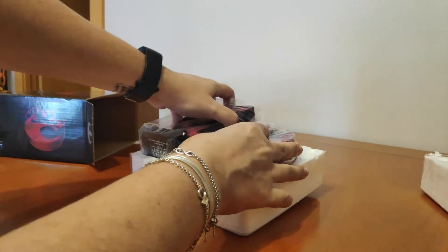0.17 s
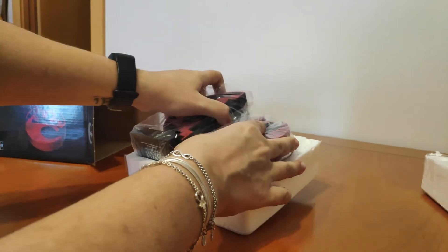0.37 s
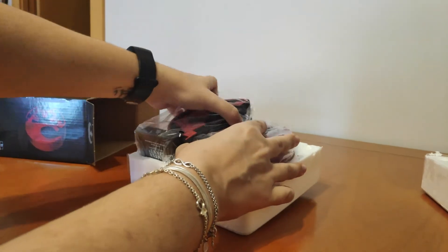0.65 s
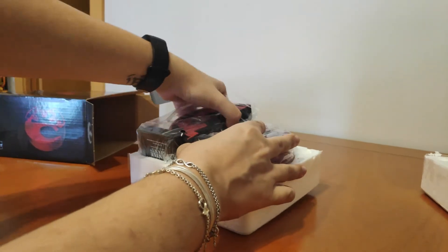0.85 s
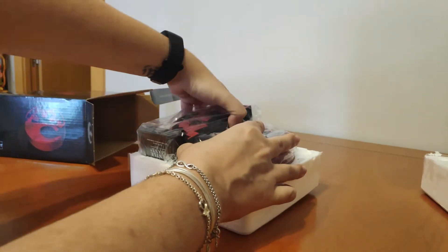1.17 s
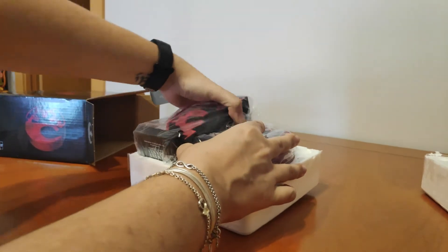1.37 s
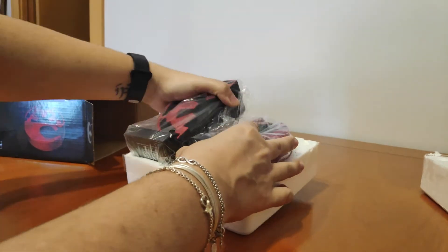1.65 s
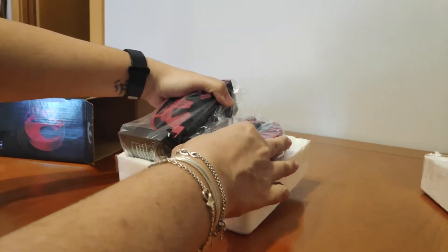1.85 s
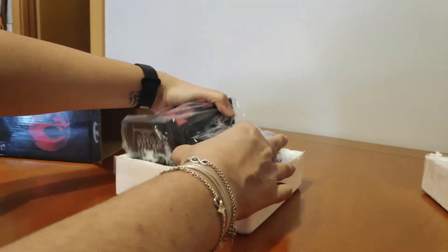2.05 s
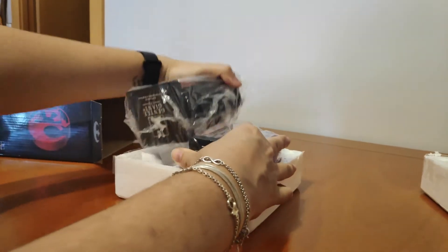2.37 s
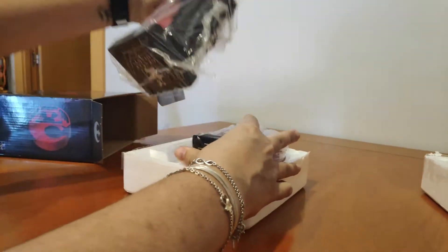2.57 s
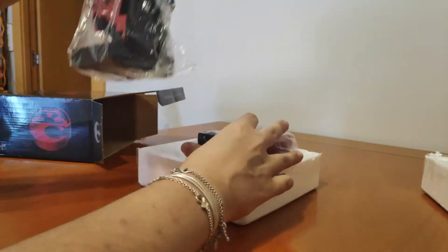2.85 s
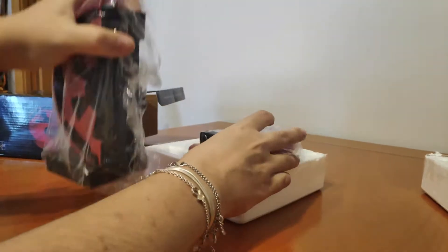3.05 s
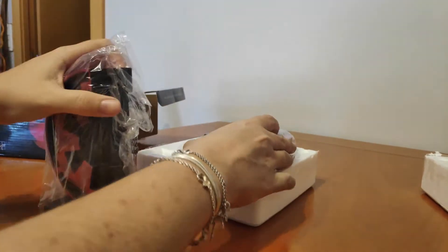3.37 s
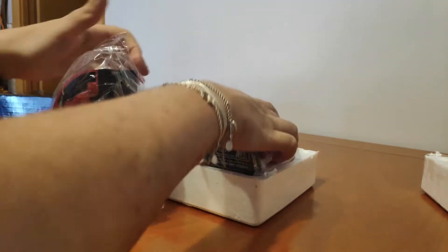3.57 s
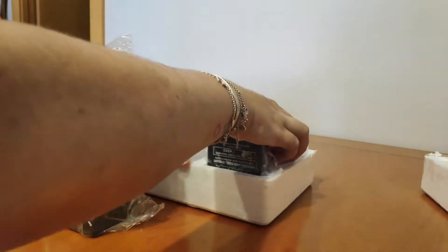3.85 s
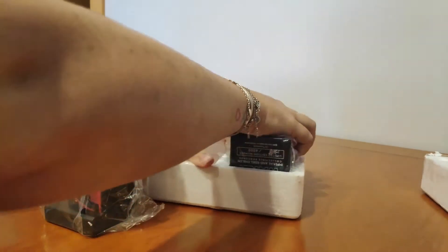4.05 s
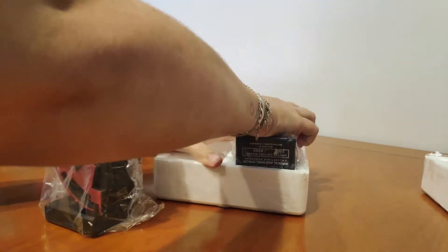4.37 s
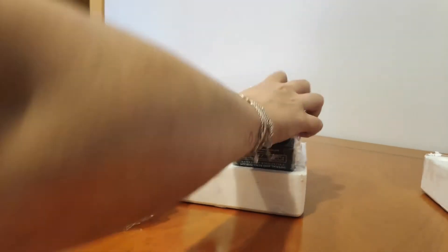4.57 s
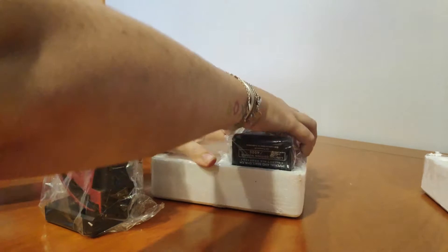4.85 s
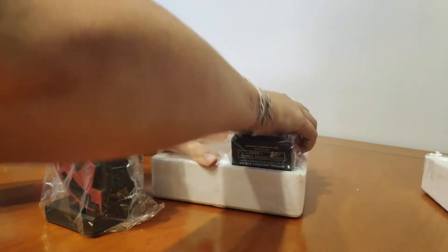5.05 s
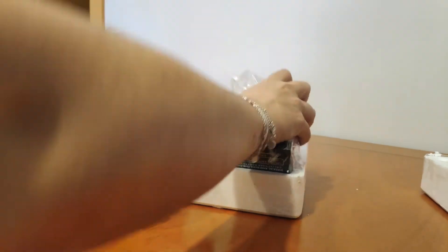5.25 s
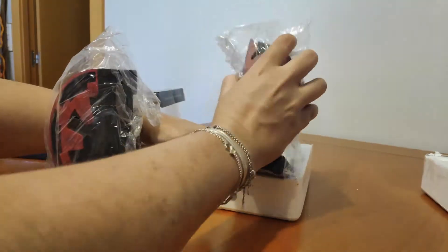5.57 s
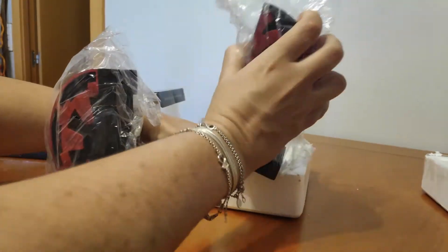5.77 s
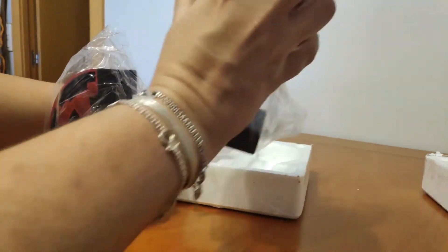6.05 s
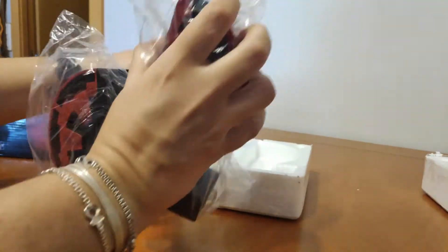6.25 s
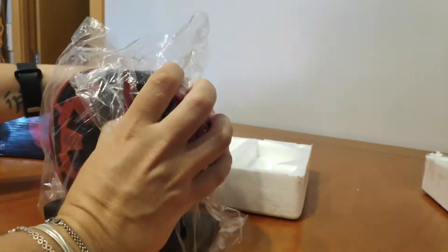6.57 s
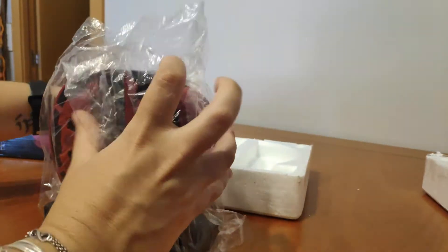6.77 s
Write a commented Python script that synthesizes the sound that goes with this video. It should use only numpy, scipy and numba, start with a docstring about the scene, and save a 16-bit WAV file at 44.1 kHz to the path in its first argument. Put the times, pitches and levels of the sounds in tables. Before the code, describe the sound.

Hands work wrapped, heavy objects out of a foam tray on a wooden table. Thin plastic rustles throughout, pricked by dry snaps. High, sliding foam squeaks cluster between two and a half and three and a half seconds and again around four, with brief later ones. One solid knock sounds midway and the strongest, resonant one near the end. Near microphones, slight room reflections, quiet background hiss.

```python
"""Hands work two heavy, bagged pieces out of a stiff foam tray on a wooden table, near two microphone ports.
Over air hiss and a low rumble the bag rustles throughout: dense tiny ticks, scuffs and short snapping bursts.
From about 2 s the bag sticks and slips on the foam: gliding overtone stacks with grit, until 5.6 s.
Blows ring the table's modes, soft at first, one strong at 3.3 s, the strongest at 6.55 s as a piece lands.
A small room answers with a decaying scatter of reflections."""
import sys
import numpy as np
from scipy import signal
from scipy.fft import rfft, irfft, next_fast_len
from scipy.io import wavfile
from scipy.ndimage import uniform_filter1d
from numba import njit

SR = 44100
rng = np.random.default_rng(int(sys.argv[2]) if len(sys.argv) > 2 else 0)


def output_pcm(signal):
    """Save a mono or channel-first signal as 16-bit PCM at the path in sys.argv[1].

    Samples are clipped to [-1, 1] before scaling.
    """
    pcm = np.clip(np.atleast_2d(signal).T, -1, 1) * 32767
    wavfile.write(sys.argv[1], SR, np.round(pcm).astype(np.int16))


N = 304863
TOP_HZ = 14280  # upper limit of overtones and of the output

# stick-slip squeaks: (overtones [dB, relative], grit [dB, relative],
# path of (time [s], slip rate [Hz], level [dB]))
SQUEAKS = [ (2, -9, [(1.983, 1760, -46), (1.99, 1980, -43), (2.0, 2670, -41)]),
           (-20, -5, [(2.462, 1880, -42), (2.472, 2594, -30), (2.482, 4300, -28)]),
           (-1, 3.5, [(2.46, 2140, -49), (2.485, 2980, -24), (2.53, 5130, -21), (2.555, 6430, -23),
           (2.573, 6260, -18), (2.59, 3820, -21.5), (2.606, 1710, -21)]), (-4, -1, [(2.655, 2090, -14.5),
           (2.668, 1905, -30), (2.688, 2670, -23.5)]), (6, -5, [(2.684, 2700, -30.5), (2.73, 2670, -32),
           (2.768, 3106, -24.5)]), (-7, -10.5, [(2.772, 2320, -24), (2.78, 1895, -23.5),
           (2.795, 1540, -49)]), (5, 7.5, [(2.836, 3190, -22), (2.857, 4510, -29.5), (2.869, 4310, -19)]),
           (5.5, 7, [(2.948, 4850, -27), (2.958, 4140, -30), (2.972, 1700, -32)]),
           (-9, 11, [(2.978, 8280, -22.5), (2.99, 4220, -38), (3.004, 1710, -24.5)]),
           (-10, -16, [(3.203, 6800, -26), (3.22, 9600, -18), (3.243, 5940, -53)]),
           (4, 10, [(3.186, 1790, -39), (3.205, 2715, -33), (3.22, 3130, -36), (3.248, 2770, -31)]),
           (1, 4, [(3.242, 2770, -34), (3.258, 3930, -25), (3.275, 4760, -23), (3.293, 5240, -26),
           (3.303, 4320, -26), (3.317, 4320, -25), (3.333, 2510, -28)]), (7, -24, [(3.238, 2280, -46),
           (3.255, 1910, -37), (3.27, 2380, -28)]), (-8, 3, [(3.33, 4234, -10), (3.34, 4310, -30.5),
           (3.373, 7920, -24), (3.384, 6730, -22.5), (3.393, 3926, -25.5), (3.408, 1430, -30)]),
           (6, -17, [(3.33, 2350, -34), (3.38, 1700, -39)]), (-6, 3, [(3.892, 2060, -35),
           (3.912, 5230, -26.5), (3.934, 8700, -17)]), (-13, 1.5, [(3.925, 2830, -44), (3.955, 2074, -34.5),
           (3.985, 2770, -46)]), (2.5, -14.5, [(3.962, 3090, -14), (3.978, 4780, -24.5), (4.0, 8120, -16),
           (4.012, 7150, -15), (4.026, 6100, -23)]), (-1, -22, [(4.02, 6030, -15), (4.033, 6180, -21),
           (4.046, 4770, -24.5), (4.072, 4850, -21), (4.085, 6000, -16), (4.104, 6580, -12.5)]),
           (-10, -22.5, [(3.974, 10110, -19), (3.985, 9680, -12.5), (4.01, 9300, -22.5)]),
           (6, -2, [(4.108, 5670, -13.5), (4.12, 4870, -23.5), (4.131, 5750, -18.5)]),
           (-8, -35, [(4.132, 8700, -12.5), (4.155, 9440, -9), (4.178, 11250, -39), (4.19, 11300, -26.5)]),
           (-10, -39, [(4.132, 8000, -17.5), (4.155, 8700, -20.5)]), (-3.5, 7.5, [(4.224, 5084, -19),
           (4.232, 4460, -25), (4.246, 2883, -25.5), (4.259, 706, -31)]), (13.5, 14, [(4.604, 701, -38.5),
           (4.62, 900, -40), (4.641, 1820, -25.5)]), (-8.5, -4, [(4.635, 1530, -15.5), (4.658, 2950, -16),
           (4.667, 3120, -10), (4.678, 3035, -16), (4.69, 2530, -25)]), (-8, 5, [(5.325, 3504, -39),
           (5.34, 3520, -37), (5.355, 3010, -29), (5.365, 2624, -34), (5.374, 1290, -25)]),
           (-1, 3, [(5.508, 1236, -38), (5.518, 1280, -44.5), (5.527, 1080, -40)]),
           (5.5, 4.5, [(5.55, 713, -35), (5.562, 1387, -33.5), (5.577, 1731, -28), (5.592, 1336, -31),
           (5.607, 656, -33.5)]), ]
# spectrum of the crisp crinkle: (frequency [Hz], density [dB per Hz, relative])
CRISP = [(1500, -35), (3500, -10), (5000, -1.5), (7500, 4.5), (10500, -1), (13000, 0.5), (15000, 2)]
# spectrum of the dull crinkle: (frequency [Hz], density [dB per Hz, relative])
DULL = [(200, -31.5), (500, -1), (1200, 2.5), (2500, -2), (4000, -5), (6000, -10.5)]


def undb(db):
    """Gain of a level in dB."""
    return 10 ** (np.asarray(db) / 20)


def unit(x):
    """Scale to rms 1."""
    return x / np.sqrt(np.mean(x ** 2))


def colour(x, table):
    """Filter by a (frequency [Hz], level [dB]) table, interpolated over log frequency."""
    size = next_fast_len(x.shape[-1] + 2048)
    hz, db = np.transpose(table)
    bin_hz = np.arange(size // 2 + 1) * SR / size
    gain = undb(np.interp(np.log(bin_hz + 1), np.log(hz), db))
    return irfft(rfft(x, size) * gain, size)[..., :x.shape[-1]]


def walk(rate_hz):
    """Random levels, smoothed twice over 1 / rate_hz; spread near 1."""
    k = max(int(SR / rate_hz), 1)
    steps = rng.standard_normal(N // 20)[np.arange(N) // max(k, 21)]
    return 1.3 * uniform_filter1d(uniform_filter1d(steps, k), k)


def add(track, start_s, piece):
    """Mix a piece into the track at a time."""
    i = int(start_s * SR)
    track[..., i:i + piece.shape[-1]] += piece[..., :N - i]


@njit
def above(x, hz):
    """State-variable high-pass whose edge moves every sample."""
    y, band, low_state = np.empty(len(x)), 0., 0.
    damping = 1.2
    for i in range(len(x)):
        g = np.tan(np.pi * hz[i] / SR)
        v = (band + g * (x[i] - low_state)) / (1 + g * (g + damping))
        low = low_state + g * v
        y[i] = x[i] - damping * v - low
        band = 2 * v - band
        low_state = 2 * low - low_state
    return y


def grains(spread_db, likeness):
    """Dense tiny ticks of uneven size, partly shared by both ports: a crisp and a dull stream."""
    sizes = undb(spread_db * rng.exponential(1., (2, N)))
    shared = rng.standard_normal((2, N))
    own = rng.standard_normal((2, 2, N))
    likeness = np.clip(likeness, 0, 1)
    ticks = sizes * (np.sqrt(likeness) * shared + np.sqrt(1 - likeness) * own)
    return unit(colour(ticks[:, 0], CRISP)), unit(colour(ticks[:, 1], DULL))


def air():
    """Quiet room noise, alike at both ports in the bass, and a swelling rumble."""
    # room noise spectrum: (frequency [Hz], density [dB, relative])
    air_spectrum = [(25, 7.5), (100, -8.5), (200, -8.5), (400, -10.5), (1000, -18.5), (3000, -30),
                    (7500, -45), (14000, -46)]
    air_db, rumble_hz, rumble_db = -57, 44, -56.5
    mid, side = rng.standard_normal((2, N))
    side = colour(side, [(150, -13), (1200, -6.5)])
    hiss = unit(colour(np.array([mid + side, mid - side]), air_spectrum)) * undb(air_db)
    band = [(rumble_hz * 0.23, -20), (rumble_hz, 0), (rumble_hz * 1.3, -3),
            (rumble_hz * 1.94, -35), (300, -90)]
    rumble = unit(colour(rng.standard_normal(N), band))
    return hiss + rumble * undb(rumble_db + 0.5 * walk(0.96))


def room(x):
    """Decaying scatter of reflections, different at each port."""
    t60_s, level_db, top_hz = .42, -12, 9000
    t = np.arange(SR // 2) / SR
    onset = np.clip((t - .002) / 0.0033, 0, 1)
    tail = rng.standard_normal((2, len(t))) * 1000. ** (-t / t60_s) * onset
    tail = signal.lfilter(*signal.butter(1, top_hz, fs=SR), tail)
    tail = tail / np.sqrt(np.sum(tail ** 2, axis=1, keepdims=True))
    return undb(level_db) * signal.fftconvolve(x, tail, axes=1)[:, :N]


def crackle():
    """Sparse small creases at random moments, a few of them much louder than the rest."""
    creases_per_s = 700
    struck = rng.random(N) < creases_per_s / SR
    sizes = undb(5.4 * np.minimum(rng.exponential(1., N), 4.0))
    ticks = struck * sizes * rng.standard_normal(N)
    fold = rng.standard_normal((2, 60)) * np.exp(-np.arange(60) / 23.0)
    return unit(colour(signal.fftconvolve(ticks[None], fold, axes=1)[:, :N], CRISP))


def settling():
    """The jolt of every squeak stretches the bag, which crinkles on as it relaxes."""
    level_db, t60_s = -7, .3
    t, strain = np.arange(N) / SR, np.zeros(N)
    for _, grit_db, path in SQUEAKS:
        s, _, db = np.transpose(path)
        strain += (t > s[0]) * (t < s[-1]) * undb(np.interp(t, s, db) + min(grit_db, 0))
    keep = 1000. ** (-1 / (t60_s * SR))
    return undb(level_db) * signal.lfilter([1 - keep], [1, -keep], strain)


def rustle():
    """The bag's crinkle under the hands and its toneless scuffs from one stream of grains, plus crackle."""
    # rustling under the hands: (time [s], crisp part [dB])
    hand_levels = [(0, -55), (.15, -46.5), (.38, -48.5), (.44, -60.5), (.6, -40.5), (.9, -46),
                   (1.05, -45.5), (1.6, -44.5), (1.92, -53), (2.0, -37), (2.4, -49.5), (3.7, -43),
                   (4.45, -47), (4.9, -41.5), (5.12, -41.5), (5.3, -42.5), (5.8, -36), (5.9, -36.5),
                   (6.08, -61), (6.17, -61.5), (6.28, -51), (6.91, -43.5)]
    # scuffs: (time [s], length [s], level [dB], dull part [dB, relative])
    scuffs = [(0.704, 0.13, -42.5, 2.5), (1.308, 0.039, -48.5, -1.5), (1.433, 0.014, -44, -6),
              (1.671, 0.047, -35, -11), (2.018, 0.012, -18.5, -15), (2.132, 0.055, -24.5, -10),
              (2.24, 0.033, -26, -7), (3.722, 0.014, -30, -19), (4.745, 0.074, -29, -3),
              (5.019, 0.025, -42.5, -5), (5.408, 0.0072, -21.5, -6), (5.703, 0.0059, -26.5, 2.5),
              (5.706, 0.039, -24, -11), (6.296, 0.038, -41, -24), (6.85, 0.057, -34.5, -9)]
    hands_dull_db, settle_dull_db = -7.5, -23  # relative to their crisp parts
    swell_db, swell_hz = 1.2, 12  # the hands never press evenly
    t = np.arange(N) / SR
    hands = undb(np.interp(t, *np.transpose(hand_levels)) + swell_db * walk(swell_hz))
    after = settling()
    flicker = undb(0.6 * walk(35) + 1.67 * walk(90))
    bright = (hands + after) * flicker
    dark = hands * undb(hands_dull_db) + after * undb(settle_dull_db)
    dark = dark * flicker * undb(3.04 * walk(30))
    creases = undb(-4.0) * hands * flicker * crackle()
    for start_s, length_s, db, dull_db in scuffs:
        u = np.arange(int(length_s * SR) + 1) / (length_s * SR)
        shape = undb(db) * np.clip(u / 0.42, 0, 1) * np.clip((1 - u) / 0.72, 0, 1)
        add(bright, start_s, shape)
        add(dark, start_s, shape * undb(dull_db))
    crisp, dull = grains(spread_db=1.98, likeness=0.049)
    # the folds that sound keep changing size, so the colour wanders
    fold_hz = np.clip(2600 * np.exp(0.28 * walk(30)), 500, 8000)
    crisp = np.array([above(n, fold_hz) for n in crisp + undb(-6) * dull])
    return bright * crisp + dark * dull + creases


def knocks():
    """A rounded push rings the table top; a softer contact pushes longer and favours the low modes."""
    # blows: (time [s], peak [dB], contact time constant [s], boost of the edge modes [dB])
    blow_list = [(0, -35.5, .0012, 25), (0.758, -33.5, 0.000061, 16), (2.013, -18.5, 0.0062, -9),
                 (3.315, -10, 0.00024, 14.5), (4.766, -32, 0.001, -2), (5.406, -32, 0.000054, 17),
                 (5.66, -40, 0.00031, 3), (6.5517, -4, 0.0002, -2.5)]
    # table top modes: (frequency [Hz], level [dB, relative], t60 [s])
    modes = [(42.3, -12, 0.93), (104, 3.5, 0.05), (119.2, -2.5, 0.4), (211.3, -18, 0.9), (256, -7, 0.49),
             (301, 2, 0.17), (400, 9, 0.051), (523, -18, 0.33), (602, -6.5, 0.095), (709, -15.5, 0.11),
             (1016, -8, 0.096), (1195, 7.5, 0.042), (1318, 2, 0.064)]
    # modes that depend on where the blow lands: (lower limit [Hz], upper limit [Hz])
    edge_range_hz = 450, 900
    out, t = np.zeros((2, N)), np.arange(SR) / SR
    spots = rng.standard_normal((len(blow_list), 2, len(modes)))
    rattle = rng.standard_normal((len(blow_list), 2, len(t)))
    shake_band = signal.butter(2, (90, 420), "bandpass", fs=SR)
    for (s, peak_db, contact_s, edge_db), spot, noise in zip(blow_list, spots, rattle):
        ring = 0
        for (hz, mode_db, t60_s), spot_level in zip(modes, spot.T):
            place_db = edge_db * (edge_range_hz[0] < hz < edge_range_hz[1])
            gain = undb(mode_db + place_db + 2.4 * spot_level[:, None])
            ring = ring + gain * np.sin(2 * np.pi * hz * t) * 1000. ** (-t / t60_s)
        # things standing on the table shake along and blur the low ring
        shake = signal.lfilter(*shake_band, noise[0] + 0.15 * noise)
        ring = ring + undb(16.5) * shake * 1000. ** (-t / 0.39)
        push = np.exp(-np.arange(2000) / (contact_s * SR))
        blow = signal.fftconvolve(ring, np.convolve(push, push)[None], axes=1)
        add(out, s, -undb(peak_db) * blow / np.abs(blow).max())
    return out


def snaps():
    """Single creases of the bag give way in bursts that decay within milliseconds."""
    # creases: (time [s], crisp peak [dB], dull part [dB re crisp, before 8 dB gain])
    crease_list = [(0.4978, -27, -40), (0.5666, -24, -30), (0.6478, -27.5, -11), (0.7192, -19, -10),
                   (0.735, -24, -26), (0.7585, -19, -1), (1.4663, -25, -13), (1.8324, -15, -56),
                   (2.3664, -19, -37), (2.393, -20, -30), (2.82, -23, 2.5), (3.5363, -17, -16.5),
                   (3.6, -19, -23), (3.676, -24, -52), (3.7541, -12.5, -26), (4.592, -27.5, -2.5),
                   (5.008, -19, -30), (5.11, -14, -47), (5.475, -22.5, -7), (5.8322, -5.5, -11.5),
                   (6.022, -26.5, -13), (6.1155, -23.5, -37), (6.135, -36.5, -12), (6.2029, -23, -26),
                   (6.312, -30, -31), (6.385, -30, -35.5), (6.445, -38, -10), (6.5253, -14, -24),
                   (6.553, -28, 8), (6.8145, -18, -19)]
    # a snap is brighter than the crinkle: (frequency [Hz], level [dB])
    snap_edge = [(3000, -16), (8000, 8), (14000, 7.5)]
    crisp_decay_s, dull_decay_s = .0007, .0015
    out, t = np.zeros((2, N)), np.arange(400) / SR
    chance = rng.standard_normal((len(crease_list), len(t)))
    for (s, db, dull_db), noise in zip(crease_list, chance):
        crisp = colour(colour(noise * np.exp(-t / crisp_decay_s), CRISP), snap_edge)
        dull = colour(noise * np.exp(-t / dull_decay_s), DULL)
        burst = crisp / np.abs(crisp).max() + undb(dull_db + 8) * dull / np.abs(dull).max()
        add(out, s, burst * undb(db))
    return out


def squeaks():
    """Stick-slip at a gliding rate: a wavering overtone stack, and grit from slips that miss the beat."""
    # multiples 2-5 of the slip rate: level [dB, relative]
    overtones_db = [-4, -7.5, -13, -12]
    spot_lag_s, fade_s = .00002, .006
    grit_db_per_octave, grit_pivot_hz = -2, 3500  # faster slipping is more regular, so less gritty
    out = np.zeros((2, N))
    crisp, dull = grains(spread_db=2.2, likeness=0.4)
    noise = crisp + undb(-8.5) * dull
    waver = .018 * walk(500)
    grit_flicker_db = 0.94 * walk(110)
    # a neighbouring patch slips at its own wandering rate and level
    stray_ratio = np.exp(.35 * walk(25))
    stray_db = -14 - 9 * np.abs(walk(60))
    # the regular slip keeps dipping for a few milliseconds
    tone_flicker_db = -6 * np.abs(walk(170))
    # each squeak comes from another spot, so its tone reaches the ports unevenly
    lags_s = spot_lag_s * rng.standard_normal((len(SQUEAKS), 1, 1)) * np.array([[1], [-1]])
    for (over_db, grit_db, path), lag_s in zip(SQUEAKS, lags_s):
        s, hz, level_db = np.transpose(path)
        i, j = int(s[0] * SR), min(int(s[-1] * SR), N)
        t = np.arange(i, j) / SR
        glide_hz = uniform_filter1d(np.interp(t, s, hz), 150, mode="nearest")
        rate_hz = glide_hz * (1 + waver[i:j])
        phase = 2 * np.pi * (np.cumsum(rate_hz) / SR - rate_hz * lag_s)
        over = 0
        for k, db in enumerate(overtones_db, start=2):
            over = over + undb(db) * np.sin(k * phase) * (k * rate_hz < TOP_HZ)
        tone = np.sin(phase) + undb(over_db) * over
        tone = 2 * tone * undb(tone_flicker_db[i:j])
        # irregular slips leave the range below the slip rate empty
        edge_hz = np.clip(0.57 * glide_hz, 500, 3800)
        grit = np.array([above(above(n[i:j], edge_hz), edge_hz) for n in noise])
        stray = np.sin(2 * np.pi * np.cumsum(rate_hz * stray_ratio[i:j]) / SR)
        grit = grit + 2 * undb(stray_db[i:j]) * stray
        tilt_db = grit_db_per_octave * np.log2(glide_hz / grit_pivot_hz)
        grit = grit * undb(grit_db + tilt_db + grit_flicker_db[i:j])
        fade = np.clip(np.minimum(t - s[0], s[-1] - t) / fade_s, 0, 1)
        out[:, i:j] += fade * undb(np.interp(t, s, level_db)) * (tone + grit)
    return out


def scene():
    """Hands, foam and bag in the room, over the table and the room noise."""
    # share of a blow that the walls send back: (frequency [Hz], level [dB])
    thud_echo = [(250, -17.5), (800, 2.5)]
    near, blows = squeaks() + snaps(), knocks()
    echoes = room(near + colour(blows, thud_echo))
    return near + blows + echoes + rustle() + air()


def record(dry):
    """Two ports a little apart hear the treble differently; the deepest bass and the top are cut."""
    # port difference: (frequency [Hz], left minus right [dB])
    ports = [(60, 1.5), (400, 1), (800, 1), (2400, 0), (5000, -2), (8000, -5.5), (11000, 8), (14000, 15.5)]
    left_lag_samples = 1
    left = colour(np.roll(dry[0], left_lag_samples), [(hz, db / 2) for hz, db in ports])
    right = colour(dry[1], [(hz, -db / 2) for hz, db in ports])
    both = signal.lfilter(*signal.butter(2, 32, "highpass", fs=SR), np.array([left, right]))
    return signal.sosfilt(signal.ellip(12, .2, 95, TOP_HZ, fs=SR, output="sos"), both)


dry = scene()
out = record(dry)
output_pcm(out)
```